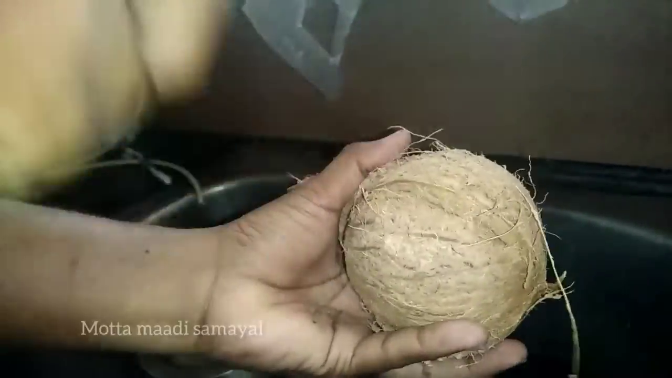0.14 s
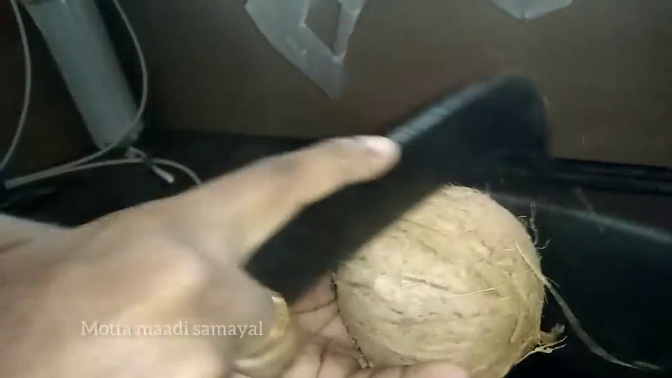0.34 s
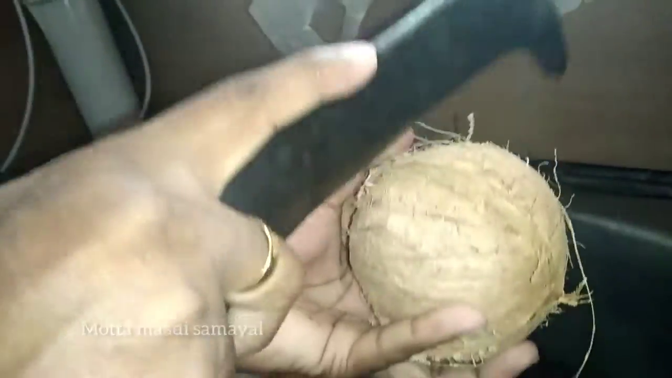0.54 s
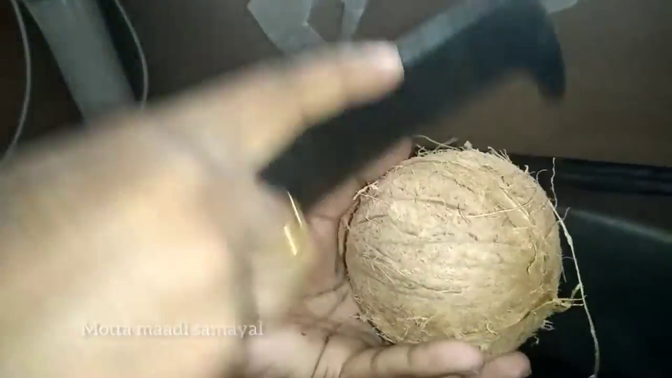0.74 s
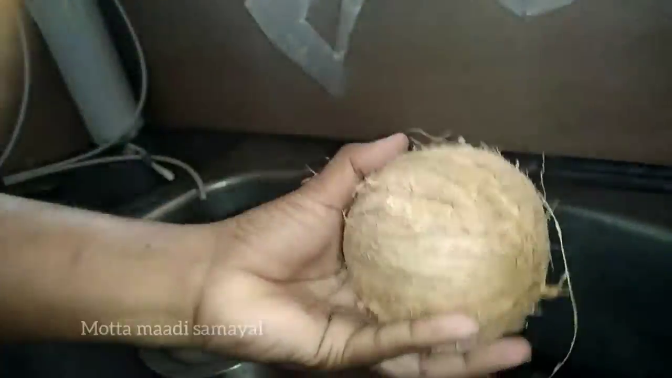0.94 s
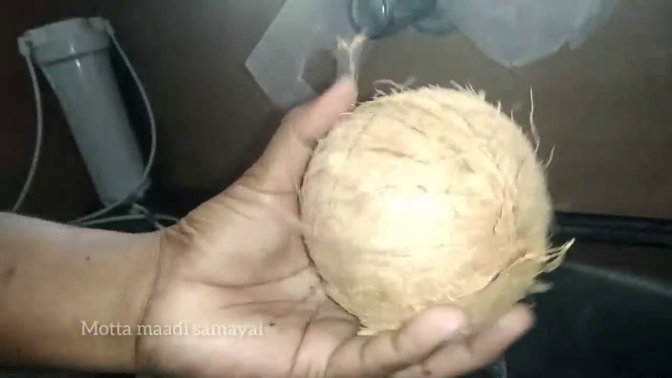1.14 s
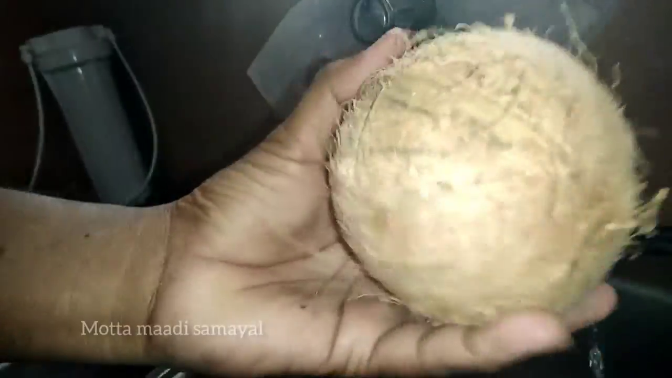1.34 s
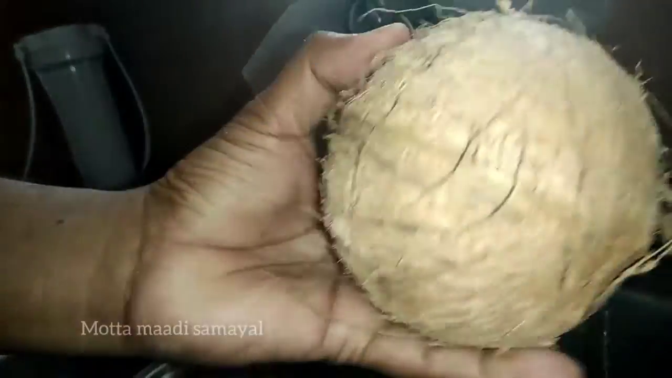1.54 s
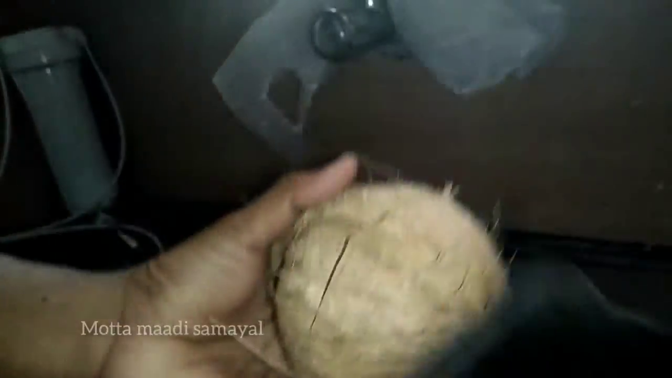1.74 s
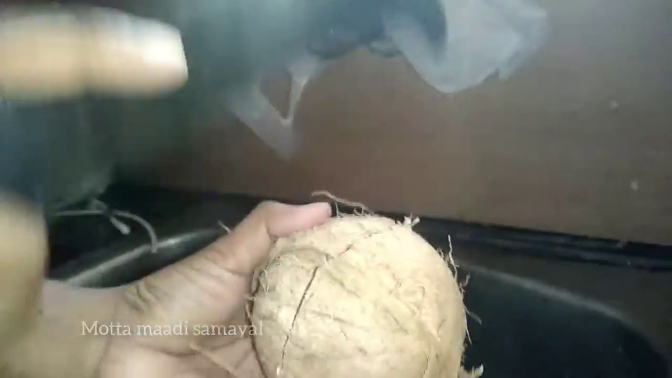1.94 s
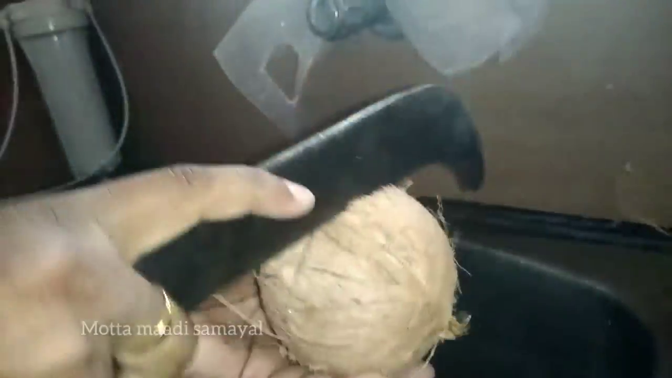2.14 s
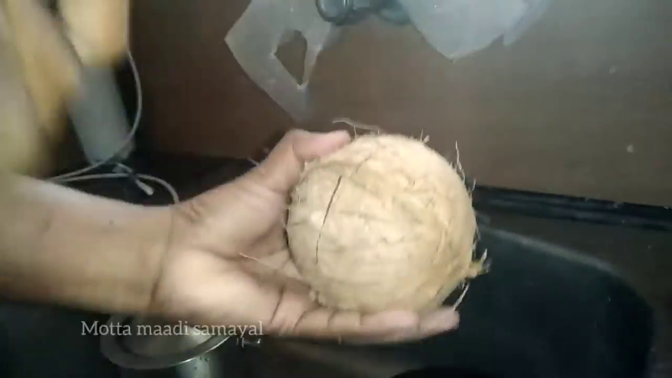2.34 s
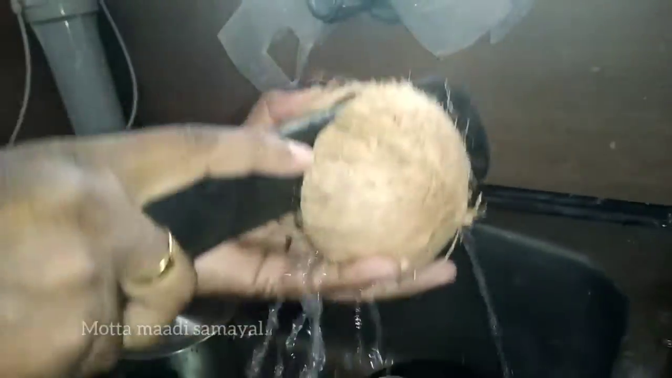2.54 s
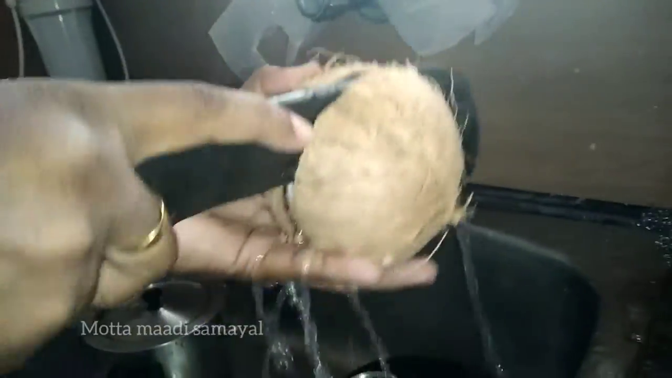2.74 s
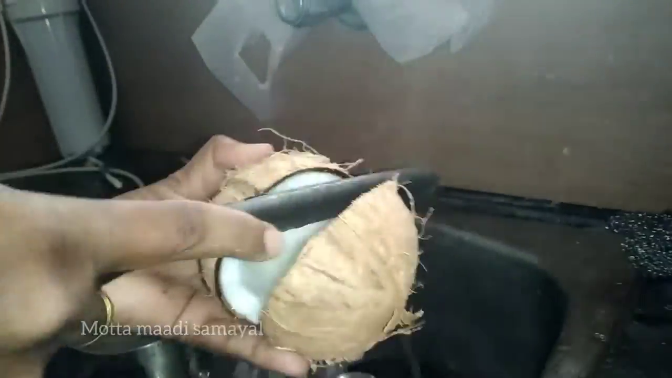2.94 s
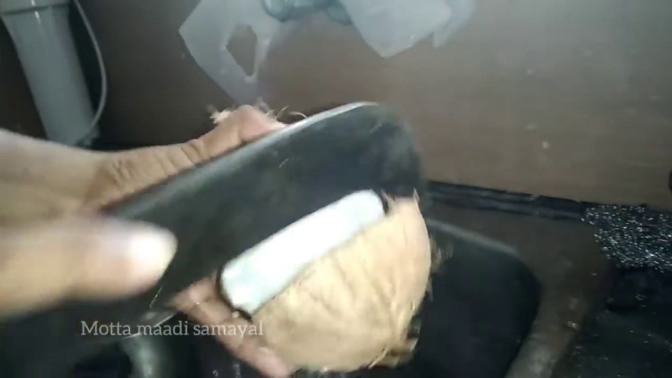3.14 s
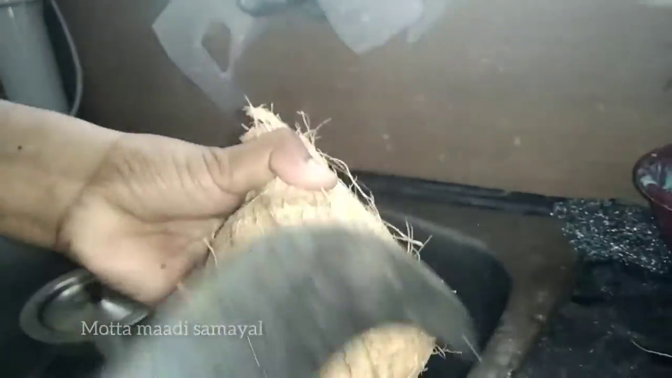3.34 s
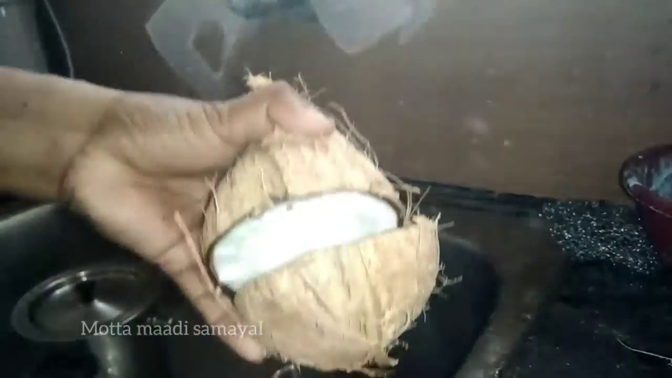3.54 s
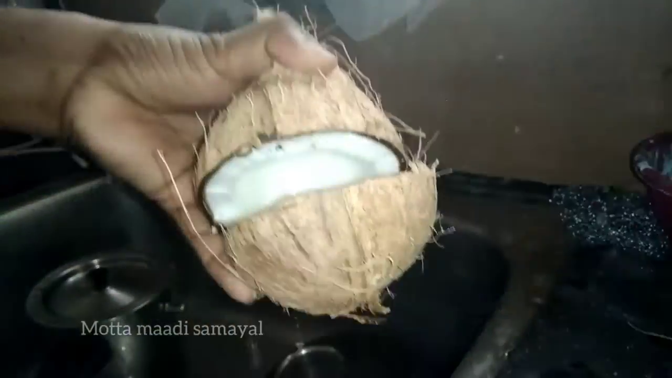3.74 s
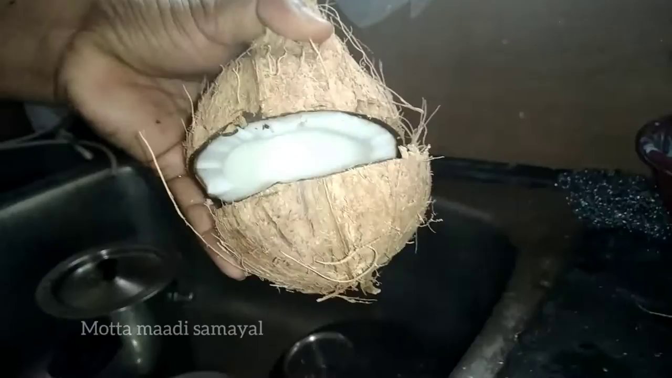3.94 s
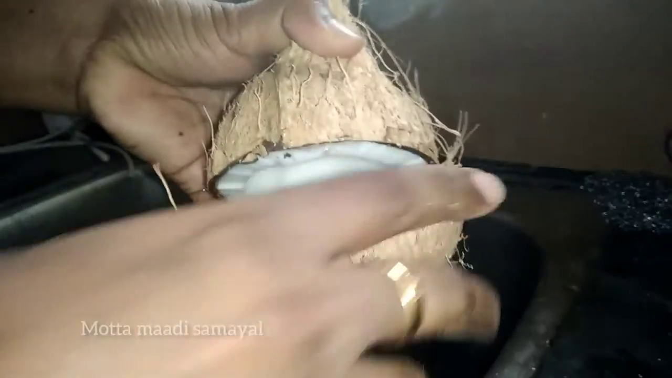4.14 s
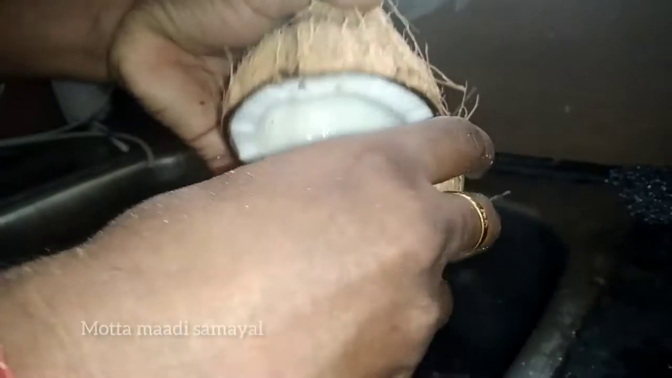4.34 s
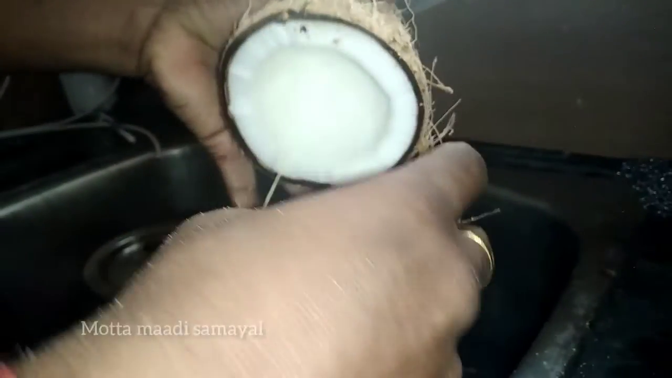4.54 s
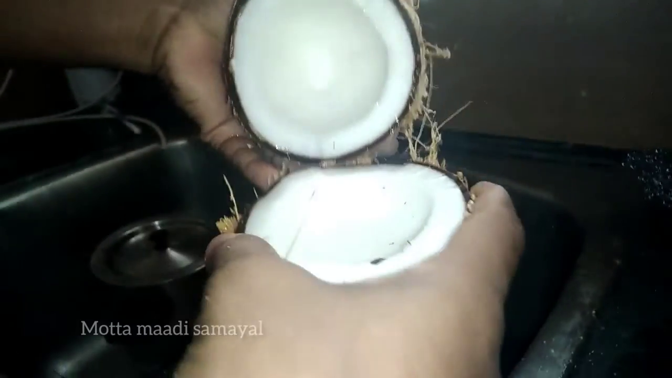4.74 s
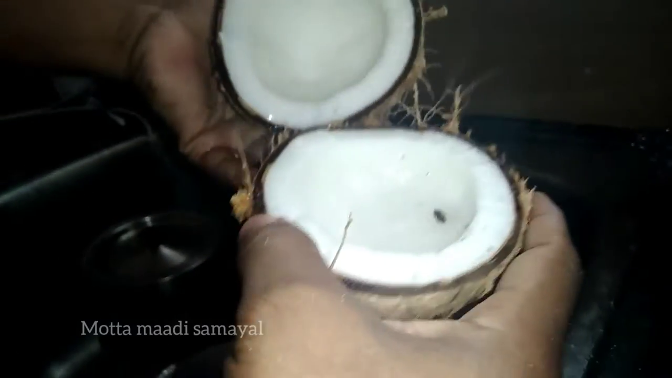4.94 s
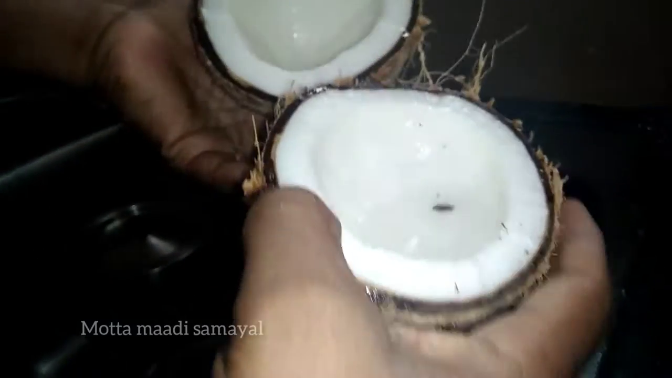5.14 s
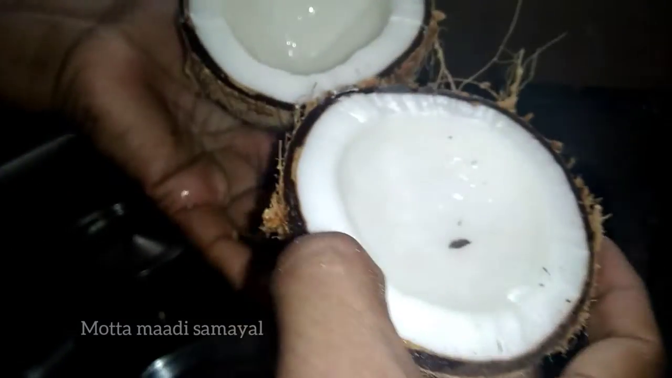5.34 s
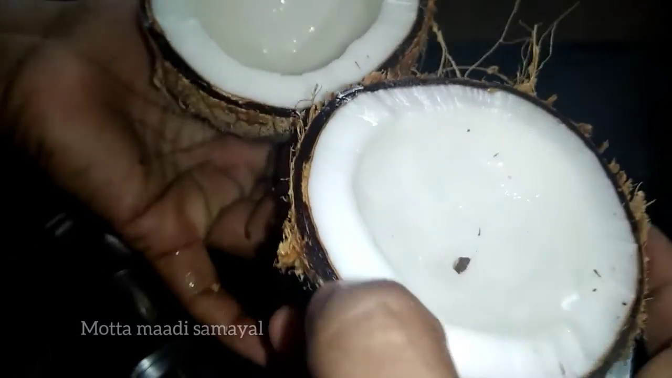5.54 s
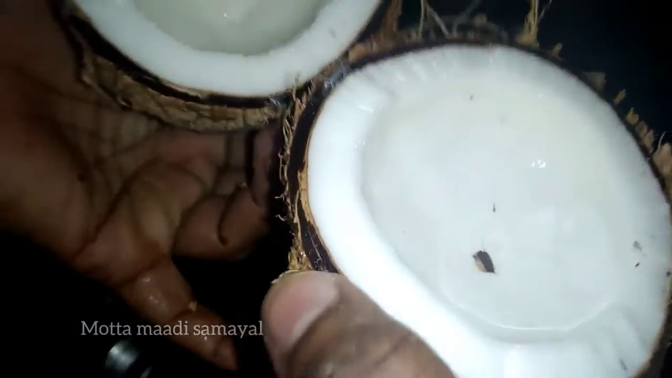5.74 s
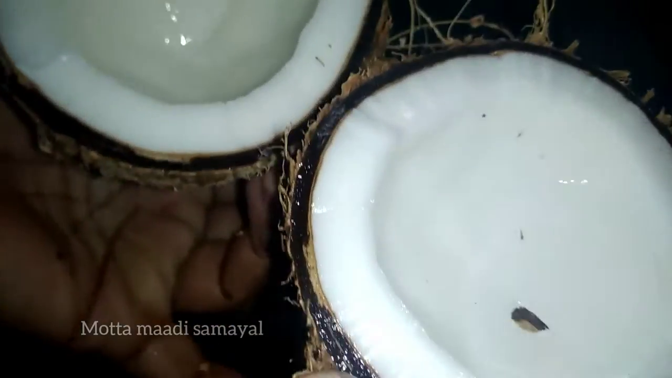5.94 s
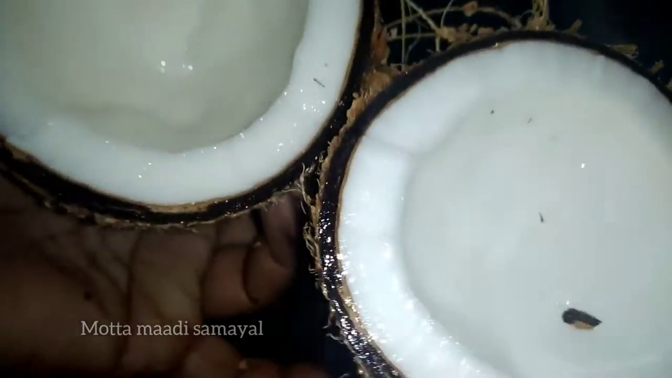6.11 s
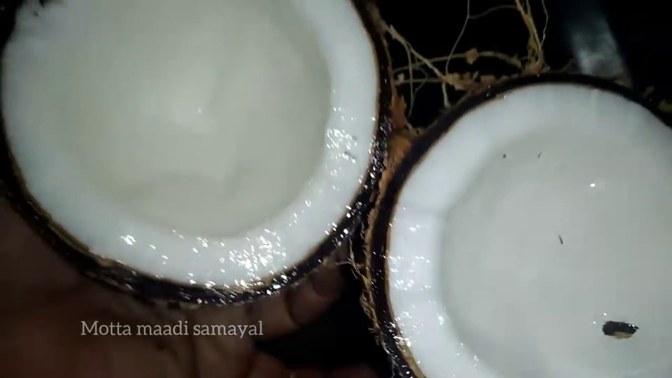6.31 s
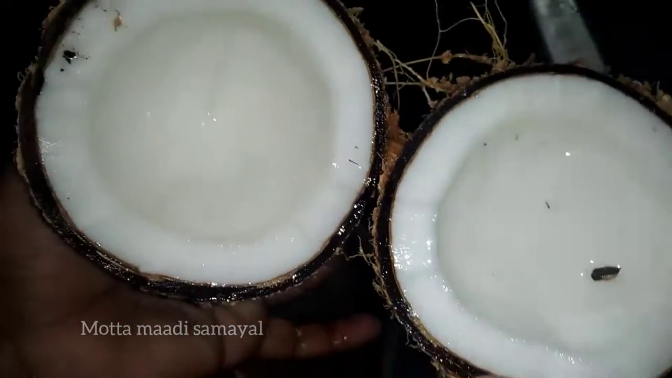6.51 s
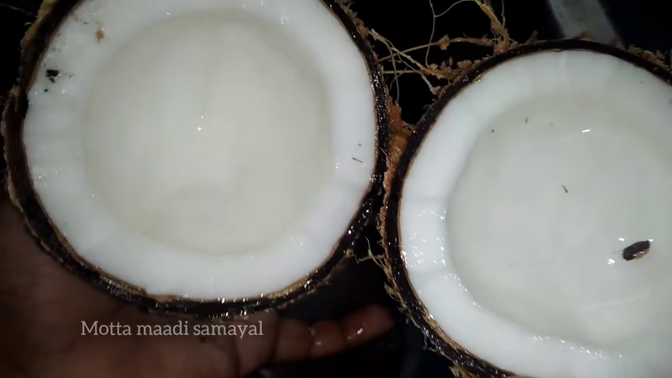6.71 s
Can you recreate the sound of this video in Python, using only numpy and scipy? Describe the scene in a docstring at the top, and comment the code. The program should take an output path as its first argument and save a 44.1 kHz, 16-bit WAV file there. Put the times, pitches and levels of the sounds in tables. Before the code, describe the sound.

Sharp, nearly overloaded knocks of metal on coconut shell, very close and wide in stereo, with bright ringing reflections. A pause with rubbing and tiny snaps, two woody hollow strikes, then fibrous tearing and a short spill of bubbling water on a steel basin. The blade clatters as it is laid down. The rest is quiet: soft husk scrapes, low room hiss, a faint drone.

```python
"""A heavy hooked blade cracks a coconut held over a steel sink in a hard-walled kitchen.
Each blow is shaped noise (crack, shell and sink) plus narrow bands at the blade's modes, with a decaying echo.
Noise bursts make knocks, snapping fibres and hollow notes; dense clicks make the rubbing husk and drumming
water, chirped sines its bubbles. Room noise, a faint drone and thin whistles lie behind, and a soft limiter
with hard clipping and a treble cutoff shapes the sum."""
import sys
import numpy as np
from scipy import signal
from scipy.fft import rfft, irfft, next_fast_len
from scipy.io import wavfile
from scipy.ndimage import uniform_filter1d, map_coordinates

SR = 44100
rng = np.random.default_rng(int(sys.argv[2]) if len(sys.argv) > 2 else 0)


def wrap_up_sound(samples):
    """Save the sound to the file named by the first command line argument, as 16-bit audio."""
    columns = np.atleast_2d(samples).T
    # keep every value between -1 and 1, then stretch to whole-number steps
    tamed = np.clip(columns, -1, 1)
    steps = np.round(tamed * 32767).astype(np.int16)
    wavfile.write(sys.argv[1], SR, steps)


N = 302946

# The blade strikes the shell, and is at last laid down: start_s, level_db, body_db, body_hz (hollow body),
# treble_db, ring_db (blade), thud_db, t60_s, rise_s, length_s, left_over_right_db (before widening)
BLOW_EVENTS = [(-.1, -18.5, 5.5, 600, 4, -5, -22, 0.31, .001, 0.9, 6.5),
               (0.2472, -6, 2.5, 520, 3, -16.5, -8.5, 0.41, 0.0005, 0.85, 4),
               (.612, -20, -0.5, 350, -2.5, -14.5, -35, 0.18, 0.0031, 1, 0.5),
               (0.977, 0.5, 1.5, 700, 2.5, -15, -34, 0.59, 0.015, .049, 0.3),
               (1.333, -21, -14, 770, -2, -6.5, -48, 0.14, 0.00096, .5, 3),
               (2.0091, -10, 1, 950, 4.5, -10, -11, 0.4, 0.002, 0.9, 4.5),
               (2.338, -5, 4.5, 1000, 6, -8.5, -21, 0.32, 0.0023, 1.0, 3),
               (3.462, -18.5, -12.5, 650, 5.5, -5.5, -48, 0.39, 0.005, 0.98, 3),
               (3.493, -20.5, -4.5, 1000, 9, -3, -45, 0.2, 0.0013, 0.34, -2),
               (3.867, -9.5, -3, 600, 3.5, -3, -24, 0.43, 0.00046, 0.76, 3.5)]
# Vibration modes of the steel blade: mode_hz, level_db
BLADE_MODES = [(820, -7), (915, -8), (1809, -8), (2013, -4), (2330, -7), (2398, -5), (2865, -5), (3255, -7),
               (3920, 0), (3984, -7), (4307, -10), (4980, -8), (5195, 1), (5805, -7), (6072, -10),
               (6650, -8), (6926, -7), (7349, -6), (7861, -1), (8150, -9), (8480, -2), (9010, -11),
               (9470, -4), (9700, -2), (10078, -3), (10333, -1), (10510, 2), (11060, -6), (11610, -8),
               (11780, -8), (12580, -10)]
# Spectrum of shell and sink under a blow: frequency_hz, density_db (per Hz)
SHELL_SPECTRUM = [(40, -47.5), (200, -14.5), (420, -3.5), (850, 2), (1350, 0), (2400, 4.5), (3500, 0),
                  (4000, 1.5), (5100, -0.5), (6200, -6), (7000, -3.5), (10300, 1.5), (12500, -4),
                  (15000, -15.5), (16000, -32)]
# Spectrum of the husk fibres: frequency_hz, density_db (per Hz)
FIBRE_SPECTRUM = [(2500, -16.5), (6500, -12), (9000, 3), (10500, 4), (13000, -2.5), (16000, -8.5)]
# Coconut water spills out: full_flow_s, level_db, rise_s, ebb_db_per_s
SPILL_EVENTS = [(2.729, -39.5, .11, 19), (3.74, -49.5, .1, 39.5), (3.92, -40.5, .06, 57.5)]


def amp(db):
    """Decibels to amplitude ratio."""
    return 10 ** (np.asarray(db) / 20)


def unit(x):
    """Normalization to an rms of 1."""
    return x / np.sqrt(np.mean(x ** 2) + 1e-20)


def along(points, hz):
    """Linear interpolation of (Hz, value) points on a log-frequency axis."""
    f, v = np.transpose(points)
    return np.interp(np.log(hz + 1), np.log(f + 1), v)


def wobble(rate, size=N):
    """Band-limited random modulation: a smooth curve through `rate` knots a second."""
    knots = rng.standard_normal(int(size * rate / SR) + 4)
    return map_coordinates(knots, [np.arange(size) * rate / SR])


def decay(t, t60):
    """Exponential damping: the amplitude falls by 60 dB in t60 seconds."""
    return np.exp(-np.log(1000) * t / t60)


def filtered(x, response):
    """Linear filtering: the spectrum of x times a response of frequency."""
    size = x.shape[-1]
    m = next_fast_len(size + 8192)
    return irfft(rfft(x, m) * response(np.fft.rfftfreq(m, 1 / SR)), m)[..., :size]


def noise(colour, size=N):
    """Spectrally shaped stereo noise of rms 1; colour gives dB for each frequency."""
    white = rng.standard_normal((2, size))
    return unit(filtered(white, lambda hz: amp(colour(hz))))


def bump(hz, centre_hz, octaves):
    """A resonance-like bell on the log-frequency axis, 1 at its centre."""
    return np.exp(-.5 * (np.log2((hz + 1) / centre_hz) / octaves) ** 2)


def add(out, s, sound):
    """Superposition: mix a sound in at time s, cutting what falls outside."""
    start = round(s * SR)
    part = sound[:, max(-start, 0):N - start]
    out[:, max(start, 0):][:, :part.shape[1]] += part


def grains(spectrum, rate, spread_db):
    """Granular excitation: dense tiny clicks of uneven size through a spectrum, rms 1."""
    sizes = amp(spread_db * np.clip(rng.standard_normal(N), -2, 2))
    clicks = (rng.random(N) < rate / SR) * sizes
    return unit(filtered(clicks * rng.standard_normal((2, N)), lambda hz: amp(along(spectrum, hz))))


def crowd(hz, spacing_hz=70):
    """Modal overlap: many close, unresolved resonances ripple the spectrum, deeper in the treble."""
    ripple = map_coordinates(rng.standard_normal(int(hz[-1] / spacing_hz) + 4), [hz / spacing_hz])
    return np.minimum(ripple, 1) * np.clip(np.sqrt(hz / 4000), .5, 1)


def patchy(x, depth_db):
    """Time-varying filtering: random patches in time and frequency shift the colour; rms 1."""
    z = signal.stft(x, nperseg=256)[2]
    field = uniform_filter1d(rng.standard_normal(z.shape[1:]), size=3, axis=0)  # over frequency
    field = uniform_filter1d(field, size=9, axis=1)  # over time
    return unit(signal.istft(z * amp(depth_db * unit(field)), nperseg=256)[1][:, :N])


def blade_ring(size, width_hz=11, scatter_db=2):
    """Modal vibration of steel at new strengths; reflections blur each mode into a narrow, beating band."""
    mode_hz, db = np.transpose(BLADE_MODES)
    power = amp(db + scatter_db * rng.standard_normal(len(db))) ** 2
    bands = lambda hz: power @ (1 / (1 + ((hz - mode_hz[:, None]) / width_hz) ** 2) ** 2)
    return noise(lambda hz: 10 * np.log10(bands(hz)), size)


def clusters(hz, width_hz=150):
    """Modal coupling: 1 near the blade's modes, 0 in the treble gaps, as the steel feeds the ringing treble."""
    mode_hz = np.transpose(BLADE_MODES)[0][:, None]
    near = np.exp(-((hz - mode_hz) / width_hz) ** 2).sum(axis=0)
    share = along([(2500, 0), (3400, 1), (12000, 1), (13500, 0)], hz)  # 1 where the steel rules
    return 1 - share * (1 - np.minimum(near, 1))


def blows(crack_db=6, crack_t60=0.029, late_db=-19, late_t60=1.196, build=0.033, free_t60=0.36, dull_db=-9):
    """Impact and reverberation: a crack, then shell, sink and steel ringing on in the kitchen's echo."""
    out, t = np.zeros((2, N)), np.arange(SR) / SR
    ripple_db, gap_db = 5.5, 8
    for s, db, body_db, body_hz, treble_db, ring_db, _, t60, rise, length, pan_db in BLOW_EVENTS:
        body = lambda hz: along(SHELL_SPECTRUM, hz) + body_db * bump(hz, body_hz, 0.93)
        colour = lambda hz: body(hz) + treble_db * bump(hz, 12000, 0.95)
        crack = amp(crack_db) * noise(colour, SR) * decay(t, crack_t60)
        ring = noise(lambda hz: colour(hz) + ripple_db * crowd(hz) + gap_db * clusters(hz), SR)
        ring = ring + amp(ring_db) * blade_ring(SR)
        # reflections first pile up, then die; a blade that sticks in the husk sets off less of them
        early = (2 - np.exp(-t / (build * t60))) * decay(t, t60)
        late = amp(late_db) * min(t60 / free_t60, 1) * decay(t, late_t60)
        # the walls swallow the top first
        echo = filtered(ring, lambda hz: amp(dull_db * bump(hz, 15000, 0.86)))
        # the blow fades in over its rise time; after its length it stops abruptly
        gate = np.clip(t / rise, 0, 1) ** 2 * decay(np.maximum(t - length, 0), 0.0053)
        level = amp(db + pan_db * np.array([[.5], [-.5]]))
        add(out, s, level * gate * (crack + ring * early + echo * late))
    return out


def lead_in(lead_db=-20):
    """Soft lead-in by exponential growth: a faint noise swells for a few milliseconds before each blow."""
    out, t = np.zeros((2, N)), np.arange(SR // 100) / SR
    for s, db, *_ in BLOW_EVENTS:
        growth = np.exp((t - t[-1]) / .0015)
        swell = noise(lambda hz: along(SHELL_SPECTRUM, hz), len(t)) * growth
        add(out, s - t[-1], amp(db + lead_db) * swell)
    return out


def thuds(thud_hz=100, thud_t60=0.072, rough_db=-5):
    """Heavy damping: the nut driven into the palm gives a low, brief push, alike in both channels."""
    out, t = np.zeros((2, N)), np.arange(SR // 2) / SR
    for s, db, _, _, _, _, thud_db, *_ in BLOW_EVENTS:
        flesh = amp(rough_db) * noise(lambda hz: 45 * (bump(hz, 130, 2.1) - 1), len(t))[:1]
        tone = np.sin(2 * np.pi * thud_hz * t) * decay(t, thud_t60 / 2)
        push = tone + flesh * decay(t, thud_t60)
        add(out, s, amp(db + thud_db) * push * np.clip(t / 0.0016, 0, 1))
    return out


def hollow(note_db=-19, hollow_hz=930, hollow_t60=0.65, swell_s=0.018, cracked_s=1.9, split_s=3.0):
    """Cavity resonance: blows on the nut, cracked but not yet open, leave a woody, hollow note."""
    out, t = np.zeros((2, N)), np.arange(SR) / SR
    for s, *_ in BLOW_EVENTS:
        if cracked_s < s < split_s:
            note = noise(lambda hz: 40 * bump(hz, hollow_hz, 0.33), SR)
            add(out, s, amp(note_db) * note * (1 - np.exp(-t / swell_s)) * decay(t, hollow_t60))
    return out


def knocks(echo_db=-23, echo_t60=.35, tone_db=7.5):
    """Light impact: a cluster of short resonances around one pitch, with a faint echo."""
    # The blade shifts in the grip on the swing, or the shell is bumped: start_s, level_db, pitch_hz, t60_s
    knock_events = [(.2215, -24, 2100, 0.031), (.940, -25.5, 1970, 0.076), (1.334, -11, 3270, 0.047),
                    (1.959, -33.5, 1820, 0.066), (2.307, -21, 2090, 0.039), (3.541, -22, 924, 0.16),
                    (3.637, -27, 1020, 0.16), (3.733, -26.5, 1008, .1), (3.744, -31.5, 2020, .08)]
    out, t = np.zeros((2, N)), np.arange(SR // 2) / SR
    ripple_db = 5
    for s, db, pitch_hz, t60 in knock_events:
        peak = lambda hz: 24 * bump(hz, pitch_hz, 0.94) + tone_db * bump(hz, pitch_hz, 0.081)
        colour = lambda hz: peak(hz) - 7 * bump(hz, 16000, 0.56)
        body = noise(lambda hz: colour(hz) + ripple_db * crowd(hz, spacing_hz=156.0), len(t))
        fall = decay(t, t60) + amp(echo_db) * decay(t, echo_t60)
        add(out, s, amp(db) * body * np.clip(t / 0.0011, 0, 1) * fall)
    return out


def snaps(wood_db=-5, snap_t60=0.064, echo_db=-23, echo_t60=.3):
    """Brittle fracture: single fibres and splinters break with a bright tick, each in its own colour."""
    # Husk fibres and shell splinters snap: start_s, level_db, woody_db (over the tick, before wood_db)
    snap_events = [(0.824, -43, -13.5), (1.199, -39, -21), (1.224, -36, -24), (1.258, -37, -17),
                   (1.483, -34, 5), (1.5643, -30, -22.5), (1.676, -40.5, -6), (2.702, -24.5, -34),
                   (2.740, -26.5, -0.5), (2.815, -25.5, -2.5), (2.906, -33.5, -11), (3.058, -20.5, -13),
                   (3.123, -28, 0.5), (3.195, -34, 10), (3.636, -26, -13), (4.28, -38, -25),
                   (4.586, -35, 0), (4.701, -35.5, -17.5), (5.398, -43, -27), (5.465, -47, -15),
                   (5.53, -38.5, -6.5), (6.243, -50, -1)]
    # Spectrum of the woody part: frequency_hz, density_db (per Hz)
    woody_spectrum = [(500, -26), (1500, -15.5), (3500, 8.5), (6500, -5), (12000, -20.5)]
    out, t = np.zeros((2, N)), np.arange(SR // 3) / SR
    for s, db, woody_db in snap_events:
        tick = noise(lambda hz: along(FIBRE_SPECTRUM, hz) + 4 * crowd(hz, spacing_hz=516), len(t))
        wood = noise(lambda hz: along(woody_spectrum, hz) + 4 * crowd(hz, spacing_hz=215.0), len(t))
        fall = decay(t, snap_t60) + amp(echo_db) * decay(t, echo_t60)
        add(out, s, amp(db) * (tick + amp(woody_db + wood_db) * wood) * fall)
    return out


def stroke_power(s, rise, fade, drop_db=22):
    """Friction builds up to the firmest contact and dies away, by drop_db in one rise or one fade."""
    t = np.arange(N) / SR - s
    return amp(-drop_db * np.minimum(np.maximum(-t / rise, t / fade), 10)) ** 2


def handling(fibre_db=-1, wet=1.0):
    """Friction noise: the husk rubs and crackles; the room smears part of the grains into a hiss."""
    # A hand or the blade slides over the husk:
    # firmest_s, rise_s, fade_s, rubbing_db, crackle_db (before fibre_db)
    stroke_events = [(0.219, 0.011, 0.036, -41, -46), (.94, 0.11, 0.3, -35.5, -44.5),
                     (1.033, 0.023, 0.027, -29, -31), (1.135, 0.31, 0.14, -34, -34),
                     (1.30, 0.16, 0.08, -41.5, -42.5), (1.499, 0.23, 0.31, -41, -37),
                     (1.854, .03, 0.1, -50, -47.5), (1.945, .015, 0.079, -47.5, -46),
                     (2.58, 0.066, .2, -35, -29.5), (2.72, 0.031, 0.33, -45.5, -32),
                     (2.841, 0.13, .1, -31, -38), (2.91, 0.036, 0.35, -28.5, -28),
                     (3.0, 0.17, 0.51, -34.5, -27.5), (3.21, 0.2, .13, -39, -30),
                     (3.363, 0.05, 0.13, -41, -28), (3.635, 0.053, 0.16, -30.5, -35.5),
                     (3.741, 0.098, 0.15, -33.5, -35.5), (4.284, 0.1, 0.11, -68, -38.5),
                     (4.48, 0.27, .3, -55.5, -50.5), (4.645, 0.15, 0.21, -48.5, -42),
                     (4.79, .1, 0.16, -51, -42), (4.88, 0.071, 0.36, -50, -43),
                     (5.175, 0.048, 0.12, -47.5, -41), (5.26, 0.13, 0.31, -56.5, -50),
                     (6.31, .08, .1, -57, -56), (6.46, 0.11, 0.16, -56, -54.5)]
    # Spectrum of the rubbing: frequency_hz, density_db (per Hz)
    rub_spectrum = [(150, -40), (400, -4), (1300, -3.5), (2500, -3.5), (4200, -5), (6000, -10.5),
                    (9000, -13.5), (14000, -38.5)]

    def texture(spectrum):
        """Granular friction and its diffuse hiss, shifting in colour as the contact moves."""
        rough = grains(spectrum, rate=1800, spread_db=4)
        hiss = noise(lambda hz: along(spectrum, hz))
        return patchy(rough + wet * hiss, depth_db=4.5)

    rubbing, crackle = np.zeros((2, N))  # powers
    for s, rise, fade, rubbing_db, crackle_db in stroke_events:
        power = stroke_power(s, rise, fade)
        rubbing += amp(rubbing_db) ** 2 * power
        crackle += amp(crackle_db + fibre_db) ** 2 * power
    return np.sqrt(rubbing) * texture(rub_spectrum) + np.sqrt(crackle) * texture(FIBRE_SPECTRUM)


def outflow():
    """Draining: each spill swells quickly, then ebbs exponentially as the nut empties."""
    flow, t = np.zeros(N), np.arange(N) / SR
    for s, db, rise, ebb_db in SPILL_EVENTS:
        ebb = amp(db - ebb_db * np.maximum(t - s, 0))
        flow += ebb * np.clip(1 + (t - s) / rise, 0, 1)
    return flow


def water(drum_db=-1, splash_gain=0.2812, count=160, drop_hz=1500, cycles=22, dry_s=4.35):
    """Drop impact and bubble resonance: water drums on the basin, and bubbles chirp up, until it runs dry."""
    # Spectrum of the steel sink under the stream: frequency_hz, density_db (per Hz)
    sink_spectrum = [(40, -35.5), (110, -12), (185, 1.5), (320, -9), (450, -4), (800, -8.5), (1300, -6),
                     (2600, -45)]
    flow = outflow() * np.clip((dry_s - np.arange(N) / SR) * 10, 0, 1)
    drum = grains(sink_spectrum, rate=900, spread_db=2)
    bubbles, t = np.zeros((2, N)), np.arange(SR // 20) / SR
    first_s = SPILL_EVENTS[0][0] - SPILL_EVENTS[0][2]
    times = rng.uniform(first_s, dry_s, count)
    for when, (pitch, left, right) in zip(times, rng.standard_normal((count, 3))):
        hz = drop_hz * 2 ** (.7 * pitch)
        life = cycles / hz
        chirp = np.sin(2 * np.pi * hz * t * (1 + 0.049 * t / life))  # the pitch climbs
        add(bubbles, when, np.outer([left, right], chirp * decay(t, 2 * life)))
    # drumming and bubbles both follow the flow
    return flow * (amp(drum_db) * drum + splash_gain * unit(bubbles))


def whistles(blur=0.67, arch_s=.17):
    """Frequency modulation: faint tones swell and fade while their pitch moves in arches of arch_s."""
    # Faint thin whistles: start_s, length_s, pitch_hz, warble_hz, level_db (before a 1.5 dB cut)
    whistle_events = [(5.656, 0.33, 2090, 5, -56), (6.1, 0.23, 1480, 10, -60),
                      (6.53, .36, 12330, 1100, -62.5)]
    out = np.zeros((2, N))
    for s, length, pitch_hz, warble_hz, db in whistle_events:
        t = np.arange(int(length * SR)) / SR
        hz = pitch_hz + warble_hz * np.abs(np.sin(np.pi * t / arch_s))
        phase = 2 * np.pi * np.cumsum(hz) / SR
        tone = np.array([np.sin(phase + blur * wobble(53, len(t))) for _ in range(2)])
        add(out, s, amp(db - 1.5) * np.sin(np.pi * t / length) * tone)
    return out


def background(air_db=-54.5, drone_from_s=4.2, drone_hz=442, drone_db=-67):
    """Stationary and narrow-band noise: room noise, a faint low drone with swells, and whistles."""
    # Spectrum of the room noise: frequency_hz, density_db (per Hz)
    air_spectrum = [(15, -38.5), (25, -19.5), (97, -5), (137, -8.5), (335, -4.5), (439, -5), (489, -3.5),
                    (591, -7.5), (1520, -8.5), (1940, -7.5), (2110, -11.5), (4250, -19.5), (8830, -24.5),
                    (11300, -11.5), (13000, -24.5), (16000, -27)]
    # Swells of the drone: top_s, half_length_s, pitch_hz, width_octaves (of the bell in dB), level_db
    swell_events = [(4.25, 0.19, 475, 0.16, -61), (4.755, 0.1, 476, 0.083, -55),
                    (4.8, 0.18, 628, 0.092, -61), (5.727, .17, 480, 0.42, -59.5),
                    (6.046, 0.19, 482, 0.1, -58.5), (6.501, 0.12, 338.4, 0.91, -55),
                    (6.6, .25, 460, 0.23, -63)]
    t = np.arange(N) / SR
    band = lambda centre_hz, octaves: noise(lambda hz: 50 * bump(hz, centre_hz, octaves))
    air = amp(air_db) * patchy(noise(lambda hz: along(air_spectrum, hz)), depth_db=2.5)
    drone = amp(drone_db) * band(drone_hz, 0.19) * np.clip((t - drone_from_s) * 10, 0, 1)
    swells = np.zeros((2, N))
    for s, half, hz, octaves, db in swell_events:
        swells += amp(db) * np.exp(-((t - s) / half) ** 2) * band(hz, octaves)
    return air + drone + swells + whistles()


def widen(x):
    """Interchannel phase: diffuse bass reaches the two channels in nearly opposite phase."""
    # Stereo width: frequency_hz, side_over_mid_db (gain on the side signal)
    side_gain = [(40, 10), (110, 16.5), (250, 10), (500, 6), (1200, 0), (15000, 0.5)]
    mid = (x[0] + x[1]) / 2
    side = filtered((x[0] - x[1]) / 2, lambda hz: amp(along(side_gain, hz)))
    return np.array([mid + side, mid - side])


def scene():
    """Superposition of all sources; the small sounds lie a little to the left."""
    small = knocks() + snaps() + handling() + water() + background() + hollow()
    return widen(blows() + lead_in() + small * amp([[1.5], [-1.5]])) + thuds()


def limiter(x, size=260):
    """Gain reduction: loud short-term levels turn both channels down; each crack slips partly through."""
    level = np.sqrt(np.abs(uniform_filter1d(np.mean(x ** 2, axis=0), size)) + 1e-12)
    gain = (1 + (level / amp(-10)) ** 4) ** (-1 / 4)  # soft ceiling at -10 dB
    return x * uniform_filter1d(gain, size // 2, origin=size // 6)  # the gain follows a millisecond late


def record(dry, top_hz=16100):
    """Nonlinear limiting, clipping at full scale, then a low-pass that cuts the top."""
    return filtered(np.clip(limiter(dry), -1, 1), lambda hz: hz < top_hz)


dry = scene()
out = record(dry)
wrap_up_sound(out)
```